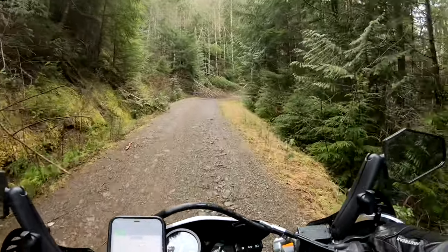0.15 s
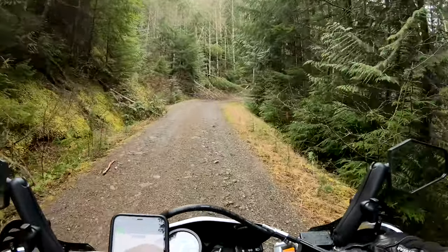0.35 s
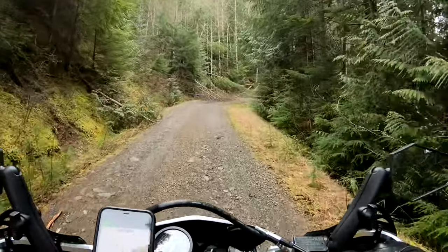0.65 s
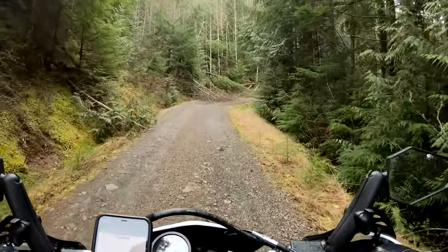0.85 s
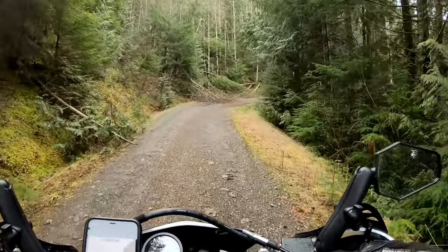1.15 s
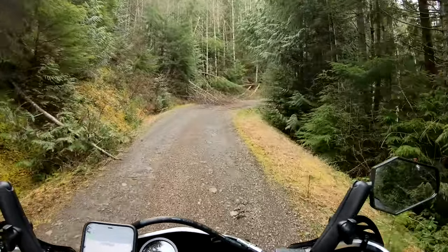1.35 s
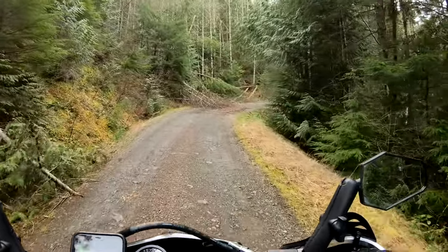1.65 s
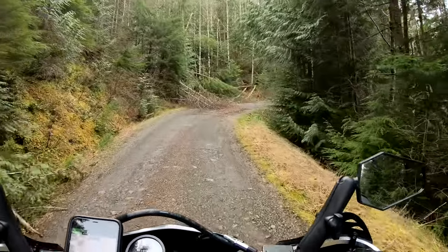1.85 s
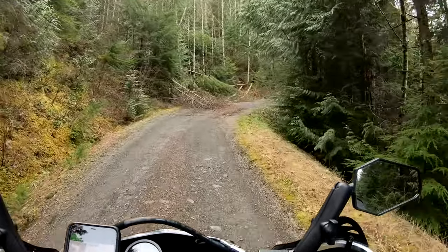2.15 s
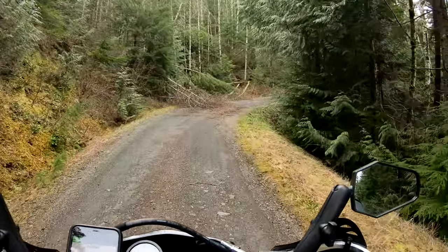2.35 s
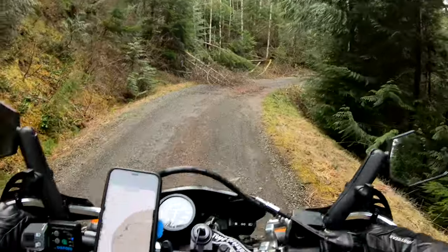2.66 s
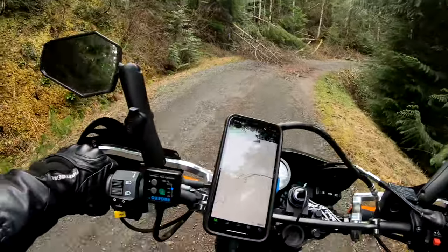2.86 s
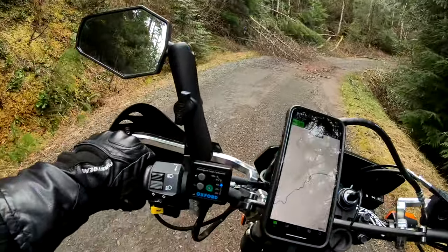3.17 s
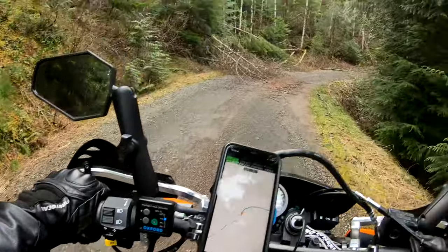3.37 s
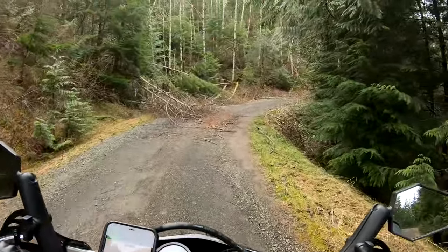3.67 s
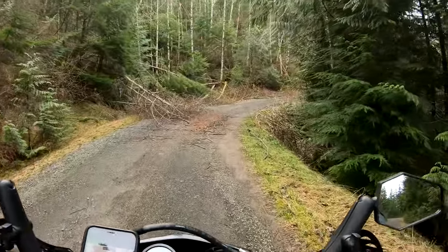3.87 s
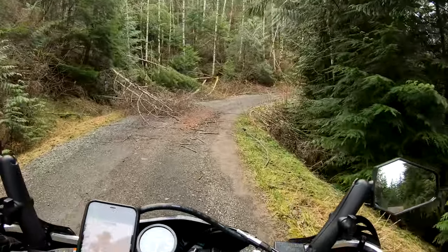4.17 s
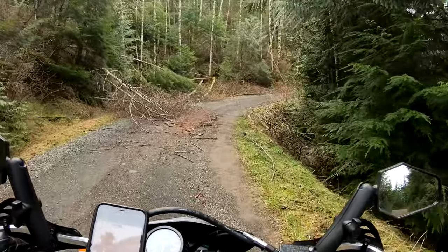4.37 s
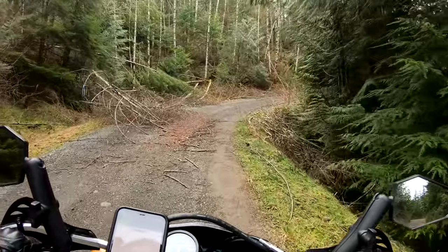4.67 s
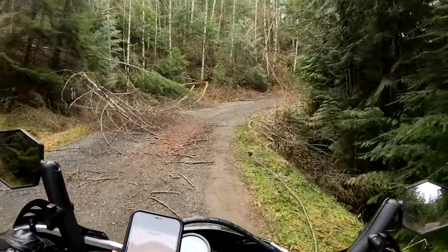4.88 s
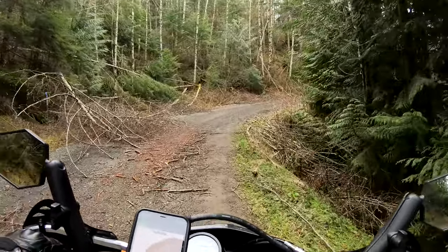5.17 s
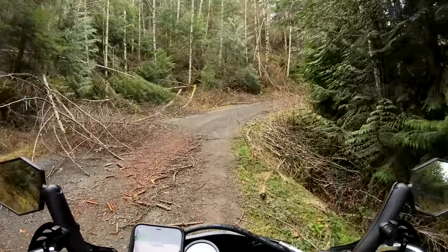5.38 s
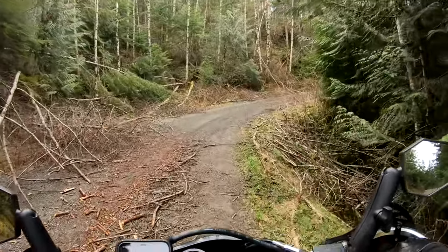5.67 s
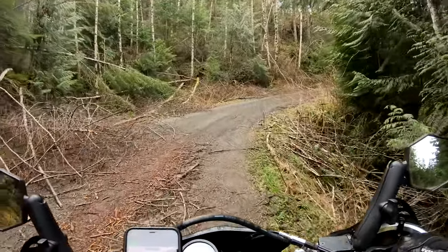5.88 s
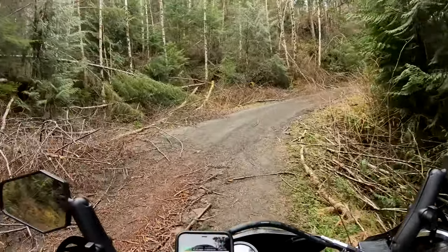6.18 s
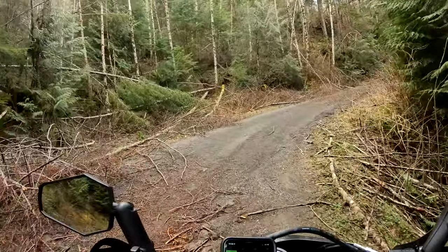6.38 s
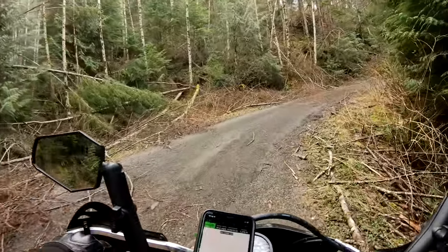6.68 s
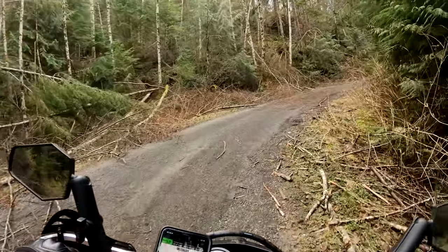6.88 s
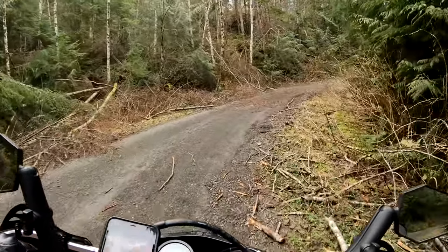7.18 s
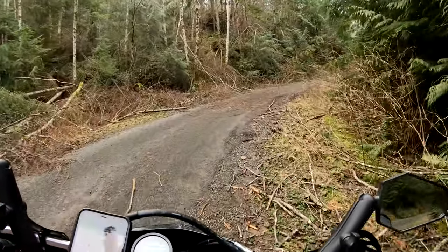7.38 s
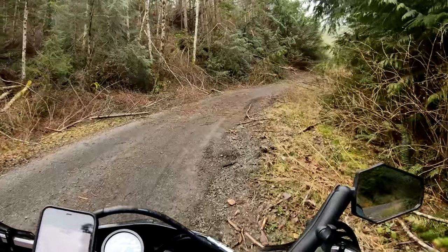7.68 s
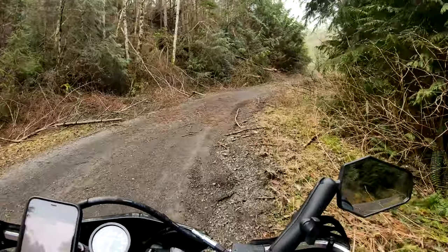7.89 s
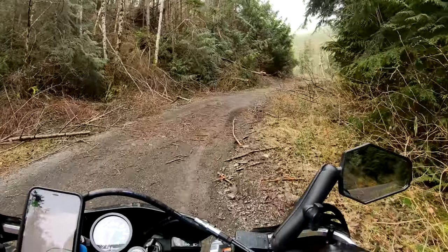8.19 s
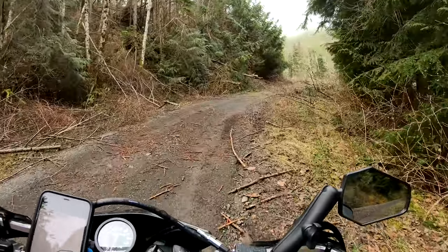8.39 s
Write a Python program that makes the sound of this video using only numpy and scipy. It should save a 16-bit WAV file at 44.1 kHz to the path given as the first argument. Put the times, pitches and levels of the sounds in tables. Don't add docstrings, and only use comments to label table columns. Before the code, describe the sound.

Low exhaust pulses of one-cylinder motorcycle dominate, close and dry, with engine case rattle, thin valve hiss and faint gravel crunch beneath. Early stones flick against the bike and wind slaps the helmet microphone. The engine coasts to a slower, duller chug, then picks up suddenly, denser and knocking. One bump thuds midway, and the steady faster drone carries on through strong closing gusts on a forest track.

```python
import sys
import numpy as np
from scipy import signal
from scipy.io import wavfile
from scipy.ndimage import uniform_filter1d

SR = 44100
rng = np.random.default_rng(int(sys.argv[2]) if len(sys.argv) > 2 else 0)


def invert_db(level):
    return 10 ** (np.asarray(level, dtype=float) / 20)


def dump(signal):
    limited = np.clip(np.atleast_2d(signal).T, -1, 1)
    pcm = np.round(limited * 32767).astype(np.int16)
    wavfile.write(sys.argv[1], SR, pcm)


N = 376613
TIME = np.arange(N) / SR

# time in seconds, firings per second.
ENGINE_SPEED = [(0.0, 16.78), (0.56, 16.31), (0.99, 14.69), (1.75, 13.83), (3.11, 14.86), (3.22, 13.89),
                (3.65, 14.85), (3.81, 23.22), (3.86, 21.44), (4.23, 21.28), (4.68, 19.17), (5.28, 19.22),
                (5.37, 18.02), (5.99, 19.62), (6.95, 20.13), (7.17, 21.11), (7.8, 20.13), (8.54, 19.54)]
COAST_HZ, PULL_HZ = 13.44, 18.6
# time in seconds, load in dB.
ENGINE_LOAD = [(0, 0), (.3, 0), (.7, -1.5), (1.1, -2.5), (1.5, -6), (2.3, -5.5), (2.7, -4), (3.35, -7.5),
               (3.75, -2), (4.25, -0.5), (5.2, -1), (6.4, 0), (7.4, 0), (8.54, 0.5)]
# level at full load in dB, dB gained per dB of load.
EXHAUST_LAW = (-15, 0.56)
CASE_LAW = (-39.5, 0.92)
ROAD_LAW = (-47.5, 1.04)
# time in seconds, roughness in dB.
ROUGHNESS = [(0, 4.5), (0.9, 3.5), (1.5, 4), (2.2, 1.5), (3.0, 4), (3.7, 1.5), (4.1, -1), (5.2, 1),
             (5.7, -1), (6.5, 2), (7.3, -3.5), (8.54, -0.5)]
# centre in seconds, peak level in dB, length in seconds.
GUSTS = [
    (0.204, -17, 0.072),
    (0.58, -23.5, 0.27),
    (1.006, -24, 0.38),
    (1.55, -23, 1),
    (5.3, -33, 0.35),
    (5.79, -24.5, .4),
    (6.494, -42, 0.54),
    (7.186, -16.5, 0.099),
    (7.727, -15.5, 0.23),
    (8.2, -21, 0.33),
]
# frequency in Hz, density in dB per Hz.
TYRE_SPECTRUM = [(71, -30), (120, -36), (170, -13.5), (276, -8), (478, -22), (764, -39.5), (936, -21),
                 (1150, -41), (1350, -35), (2590, -39), (5720, -42), (10500, -59), (15500, -87)]
# frequency in Hz, width in Hz, level in dB.
GEAR_BANDS = [(3070, 39, -14.5), (3470, 36, -13.5), (3740, 56, -24), (5660, 68, -12), (5773, 56, -11),
              (6720, 210, -14), (8780, 900, -11.5)]
# time in seconds, level in dB, frequency in Hz.
GRIT_TICKS = [
    (4.867, -34.5, 11000),
    (6.482, -35, 9000),
    (6.534, -31, 7060),
    (7.3, -33, 5000),
]
# time in seconds, peak in dB, treble in dB, length in seconds.
STONES = [(0.14, -33, -48, 0.0047), (0.252, -28, -45, 0.0066), (0.356, -22, -48, 0.0051),
          (0.402, -26, -48, 0.0049), (0.468, -24, -45, 0.0056), (0.485, -24.5, -41, 0.012),
          (0.545, -40, -44, 0.0057), (0.678, -21, -52, 0.0076), (0.864, -21.5, -50, 0.0048),
          (1.017, -25, -58, 0.0043), (1.067, -29.5, -60, 0.017), (1.12, -31, -59, 0.0089),
          (1.371, -26, -40, 0.0053), (1.432, -30, -41, 0.0066), (2.66, -29, -54, 0.0065),
          (3.714, -26, -53, 0.0043), (4.934, -35, -55, 0.048), (6.285, -25, -62, 0.0063),
          (7.68, -34, -62, 0.015)]
# time in seconds, frequency in Hz, level in dB.
SQUEAL = [
    (4.6, 915, -66),
    (4.68, 929, -45),
    (4.8, 999, -48),
    (4.93, 1030, -44.5),
    (5.0, 1080, -66),
]
# frequency in Hz, t60 in seconds, level in dB.
THUD = (108, 0.22, -10)
# frequency in Hz, t60 in seconds, level in dB.
AIR_BOX = [(249.4, 0.062, -23.5), (405.1, 0.063, -17), (483, 0.066, -18)]
# frequency in Hz, width in Hz, level in dB.
CASE_MODES = [(378.4, 60, 0), (466, 64, -0.5), (634, 170, -12.5), (934, 75, -6), (1335, 100, -3.5),
              (1566, 127, -3.5), (1891, 95, -9), (2092, 166, -11.5)]
# share of the cycle, decay in ms, dB throttle shut, dB throttle open.
CASE_BLOWS = [
    (.8, 9.7, 1, 2.5),
    (.34, 4.6, 9, -22),
    (0.27, 3.9, -17, 3.5),
]
# time in seconds, knock level in dB, buzz level in dB.
STRAIN = [(0, -31, -65), (0.6, -26, -45), (1.2, -49, -53), (3.6, -67, -64), (3.75, -30, -61),
          (3.97, -31, -53), (4.05, -20.5, -56), (4.38, -24.5, -59), (4.55, -26.5, -62), (5.3, -27.5, -68),
          (6.0, -28, -47), (6.9, -24.5, -49), (7.2, -26, -49), (7.5, -30, -42), (7.7, -41, -43),
          (8.0, -34, -48), (8.2, -22, -34), (8.54, -45, -50)]
# frequency in Hz, t60 in seconds, level in dB.
KNOCK_MODES = [(1324, 0.031, -4.5), (1590, 0.018, 3), (2040, 0.026, -12.5), (3500, 0.034, -16.5),
               (3730, 0.042, -15.5)]
# time in seconds, peak in dB, favoured mode in Hz.
HARD_KNOCKS = [(0.0484, -20, 1370), (0.1334, -13.5, 1280), (0.2309, -18, 1400), (0.2862, -17, 1580),
               (0.847, -20.5, 1460), (1.011, -17, 1320), (1.427, -19, 1360), (3.6975, -18.5, 1590),
               (3.752, -23, 1390), (3.8674, -21, 1370), (4.0287, -18, 1350), (4.0756, -21, 1550),
               (4.1225, -23, 1310), (4.1708, -25, 1350), (4.2165, -18, 1510), (4.2639, -14, 1527),
               (4.3113, -14, 1550), (4.3585, -18, 1560), (4.4084, -32, 1580), (4.4575, -26, 1560),
               (4.5072, -33, 1600), (4.711, -22, 1630), (4.815, -21, 1590), (4.9197, -23, 1590),
               (5.2322, -22, 1650), (5.2854, -20, 1620), (5.3383, -21, 1370), (5.5024, -21, 1510),
               (5.613, -20, 1600), (5.875, -30, 1330), (5.9765, -14, 1340), (6.028, -17, 1340),
               (6.0831, -33, 1600), (6.1335, -19, 1330), (6.1818, -25, 1270), (6.3345, -19, 1320),
               (6.3869, -27, 1320), (6.735, -21, 1260), (6.8349, -18, 1320), (6.8853, -26, 1360),
               (6.9351, -30, 1390), (6.984, -24, 1310), (7.0329, -16, 1374), (7.4649, -30, 1320),
               (7.4914, -21, 1370), (8.109, -20, 1570), (8.1574, -26, 1370), (8.2067, -21, 1340),
               (8.2585, -25, 1320), (8.3093, -20, 1370)]
# frequency in Hz, t60 in seconds, level in dB, sign.
PIPE_SHUT = [(47.2, 0.18, 3, 0.64), (111.3, 0.1, 3, -0.95), (185, 0.0428, 3.5, -1.12),
             (219, 0.095, -3, -1.3), (288.8, 0.076, 5.5, 0.98)]
PIPE_OPEN = [(43.2, 0.05, 5.5, 0.99), (109.4, 0.13, -1, -0.65), (226.3, 0.035, 6, -0.97),
             (301, 0.076, 2.5, 0.98), (391, 0.26, -18, -0.34), (491, 0.08, -12, 0.75)]
# delay in ms, strength (negative is suction).
SLUG_SHUT = [
    (-1.5, 0.26),
    (-0.5, 0.72),
    (7.5, -0.54),
    (14.5, 0.52),
]
SLUG_OPEN = [
    (-1, 0.27),
    (1.04, 0.92),
    (9.5, 1.194),
]
HEAT_SHUT = (14.3, 0.4)
HEAT_OPEN = (20.2, 0.6)


def level(x, db):
    return x * invert_db(db) / np.sqrt(np.mean(x ** 2))


def noise():
    return rng.standard_normal(N)


def ring(x, hz, t60):
    pole = np.exp(2j * np.pi * hz / SR - np.log(1000) / (t60 * SR))
    return signal.lfilter([1], [1, -pole], x).imag


def band(x, hz, width):
    return signal.lfilter(*signal.iirpeak(hz, hz / width, SR), x)


def steep_band(x, hz, width):
    return band(band(x, hz, width), hz, width)


def walk(rate):
    hold = int(SR / rate)
    steps = np.repeat(rng.standard_normal(N // hold + 1), hold)
    return 0.96 * uniform_filter1d(uniform_filter1d(steps, hold), hold)[:N]


def follow(table, at=TIME, column=1):
    columns = np.transpose(table)
    return np.interp(at, columns[0], columns[column])


def spikes(times, sizes):
    out = np.zeros(N)
    k = (np.asarray(times) * SR).astype(int)
    inside = (k >= 0) & (k < N)
    np.add.at(out, k[inside], sizes[inside])
    return out


def burst(pulses, decay_s):
    return signal.lfilter([1], [1, -np.exp(-1 / (decay_s * SR))], pulses)


def cycle_times(share):
    turns = -0.04 + np.cumsum(follow(ENGINE_SPEED)) / SR
    cycles = np.arange(int(turns[-1]) + 1)
    times = np.interp(cycles + share, turns, TIME, left=-1, right=-1)
    throttle = (follow(ENGINE_SPEED, times) - COAST_HZ) / (PULL_HZ - COAST_HZ)
    return times, np.clip(throttle, 0, 1)


def buffeting():
    swing = signal.sosfilt(signal.butter(2, [4.5, 27], "band", fs=SR, output="sos"), noise())
    swing = swing / np.sqrt(uniform_filter1d(swing ** 2, size=9000) + 0.053 * swing.var())
    calm = invert_db(-30)
    gusts = sum(invert_db(db) * np.exp(-(2 * (TIME - s) / length) ** 2) for s, db, length in GUSTS)
    return swing * (calm + gusts)


def tyres(shake):
    log_hz, density_db = np.log(np.transpose(TYRE_SPECTRUM)[0]), np.transpose(TYRE_SPECTRUM)[1]
    sparse = rng.random(N) < 0.02
    grit = noise() * invert_db(2.0 * rng.exponential(size=N) * sparse)
    rough = follow(ROUGHNESS)
    crunch = 0
    for hz in 140 * 2 ** np.arange(0, 6.8, 1 / 3):
        db = np.interp(np.log(hz), log_hz, density_db) + 1.44 * walk(21)
        if hz < 520:
            db = db + rough
        crunch = crunch + invert_db(db) * steep_band(noise() + 0.92 * grit, hz, hz / 3)
    crunch = crunch * (1 + 0.77 * shake)
    treble = signal.sosfilt(signal.butter(4, 2800, "high", fs=SR, output="sos"), crunch)
    return invert_db(-2.5) * crunch / treble.std()


def valve_gear(shake):
    hiss = 0
    for hz, width, db in GEAR_BANDS:
        tone = level(band(noise(), hz, width), 0)
        hiss = hiss + invert_db(db + 2.4 * walk(9)) * tone * (1 + 0.5 * shake)
    return invert_db(-5.0) * hiss


def grit_ticks():
    out = 0
    for s, db, hz in GRIT_TICKS:
        contact = noise() * burst(spikes([s], invert_db(np.array([db]))), 0.0016)
        out = out + steep_band(contact, hz, 0.9 * hz)
    return out


def stones():
    rise_s = 0.014

    def swell(column):
        out = 0
        for row in STONES:
            contact = spikes([row[0] - rise_s], invert_db(np.array([row[column]])))
            out = out + burst(burst(contact, max(row[3], 0.001)), rise_s)
        return out / (rise_s * SR / 2)

    body = level(steep_band(noise(), 1320, 1300), -6.5)
    edge = level(steep_band(noise(), 4600, 5000), -1.9)
    return swell(1) * body + swell(2) * edge


def drive_squeal():
    s, _, db = np.transpose(SQUEAL)
    hz = follow(SQUEAL) * (1 + 0.005 * walk(40))
    tone = np.sin(2 * np.pi * np.cumsum(hz) / SR)
    breath = 0.4 * level(steep_band(noise(), 2400, 600), 0)
    return invert_db(np.interp(TIME, s, db, left=-150, right=-150)) * np.sqrt(2) * (tone + breath)


def frame_thud():
    hz, t60, db = THUD
    return invert_db(db) * ring(spikes([4.92], np.ones(1)), hz, t60)


def intake():
    times, throttle = cycle_times(0.81)
    gulp_db = -7 * (1 - throttle) + 0.8 * rng.standard_normal(len(times))
    gulps = spikes(times, invert_db(gulp_db))
    tone = sum(invert_db(db) * ring(gulps, hz, t60) for hz, t60, db in AIR_BOX)
    return uniform_filter1d(uniform_filter1d(tone, size=44), size=30)


def case_shake():
    shake = invert_db(1.27 * walk(25))
    for share, decay_ms, shut_db, open_db in CASE_BLOWS:
        times, throttle = cycle_times(share)
        size_chance, time_chance = rng.standard_normal((2, len(times)))
        size = invert_db(shut_db + (open_db - shut_db) * throttle + 2.1 * size_chance)
        shake = shake + burst(spikes(times + 0.0015 * time_chance, size), decay_ms / 1000)
    return level(shake, 0)


def case_rattle(shake):
    rough = follow(ROUGHNESS)
    rattle = 0
    for hz, width, db in CASE_MODES:
        mode = level(steep_band(noise() * shake, hz, 1.67 * width), 0)
        rattle = rattle + invert_db(db + (rough if hz < 520 else 0)) * mode
    upper_power = sum(invert_db(2 * db) for hz, _, db in CASE_MODES if hz > 800)
    return rattle / np.sqrt(upper_power)


def panel_buzz(shake):
    hz, width = 1352, 65
    rub = noise() * shake * invert_db(4.8 * walk(20))
    buzz = band(band(rub, hz, width), hz, 3.5 * width)
    return level(buzz, 0) * invert_db(follow(STRAIN, column=2))


def knock():
    times, _ = cycle_times(0.785)
    first_chance, time_chance, second_chance = rng.standard_normal((3, len(times)))
    db = follow(STRAIN, times) - 5.5
    first = spikes(times, invert_db(db + 0.89 * first_chance))
    second = spikes(times + 0.003286 + 0.00027 * time_chance, invert_db(db + 2.0 * second_chance))
    hits = first + second
    return sum(invert_db(gain_db) * band(ring(hits, hz, t60), hz, 0.35 * hz) for hz, t60, gain_db in KNOCK_MODES)


def hard_knocks():
    t = TIME[:SR // 20]
    t60 = 0.023

    def mode(hz, t60):
        return np.exp(-np.log(1000) * t / t60) * np.sin(2 * np.pi * hz * t)

    onset = (1 - np.exp(-t / 0.0007)) ** 2
    edge = invert_db(-10.5) * mode(2060, t60)
    fin = invert_db(-36) * mode(3760, 0.028)
    out = np.zeros(N + SR)
    for s, db, hz in HARD_KNOCKS:
        rap = (mode(hz, t60) + 0.7 * mode(2920 - hz, t60) + edge + fin) * onset
        for lag_s, size in ((0, 1), (0.0034, 0.18)):
            start = int((s + lag_s) * SR)
            out[start:start + len(t)] += size * invert_db(db - 4.5) * rap
    return out[:N]


def exhaust():
    times, throttle = cycle_times(0)
    revs = follow(ENGINE_SPEED, times)
    rough = invert_db(follow(ROUGHNESS, times))
    chance = rng.standard_normal((len(times), 12))
    tail = np.arange(SR // 5)
    out = np.zeros(N + SR)
    shut = (1 - throttle, SLUG_SHUT, PIPE_SHUT, HEAT_SHUT)
    pulling = (throttle, SLUG_OPEN, PIPE_OPEN, HEAT_OPEN)
    for share, slugs, modes, (usual_revs, power) in (shut, pulling):
        impulse = 1.0 * (tail == 0)
        pipe = sum(sign * invert_db(db) * ring(impulse, hz, t60) for hz, t60, db, sign in modes)
        hurry = (revs / usual_revs) ** power * (1 + 0.008 * rough * chance[:, 0])
        for k, (delay_ms, size) in enumerate(slugs):
            jitter_ms = rough * (0.2 * chance[:, 1] + 0.12 * chance[:, 2 + k])
            at = (times + ((delay_ms - 0.9) / hurry + jitter_ms) / 1000) * SR
            gain = size * share * invert_db(0.2 * chance[:, 6] + 0.6 * rough * chance[:, 7 + k])
            for i in np.flatnonzero((at > 0) & (share > 0)):
                stretched = (tail - at[i] % 1) * hurry[i]
                out[int(at[i]) + tail] += gain[i] * np.interp(stretched, tail, pipe, left=0, right=0)
    return level(uniform_filter1d(uniform_filter1d(out[:N], size=44), size=44), 0)


def scene():
    load = follow(ENGINE_LOAD)

    def loudness(law):
        return invert_db(law[0] + law[1] * load)

    shake = case_shake()
    late_shake = np.roll(shake, int(0.004 * SR))
    mix = buffeting() + loudness(ROAD_LAW) * (tyres(late_shake) + valve_gear(late_shake))
    mix = mix + grit_ticks() + stones() + drive_squeal() + frame_thud() + intake()
    mix = mix + loudness(CASE_LAW) * case_rattle(shake) + panel_buzz(shake)
    mix = mix + knock() + hard_knocks() + loudness(EXHAUST_LAW) * exhaust()
    return mix[None]


def band_limit(x):
    return signal.sosfilt(signal.butter(12, 15710, fs=SR, output="sos"), x)


def record(dry):
    rounded = np.tanh(0.59 * dry) / 0.61
    mix = signal.sosfilt(signal.butter(1, 3, "high", fs=SR, output="sos"), rounded)
    return band_limit(mix)


dry = scene()
out = record(dry)
dump(out)
```